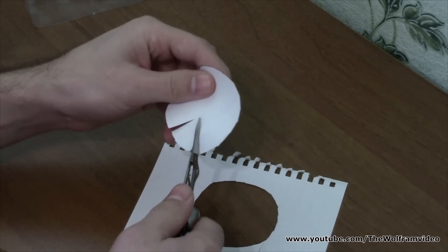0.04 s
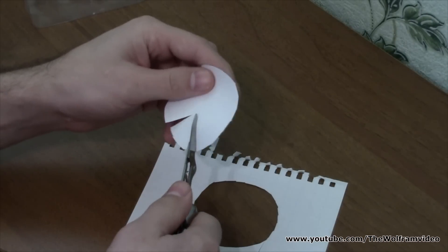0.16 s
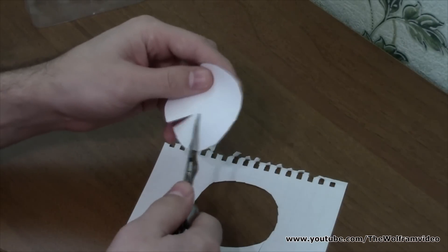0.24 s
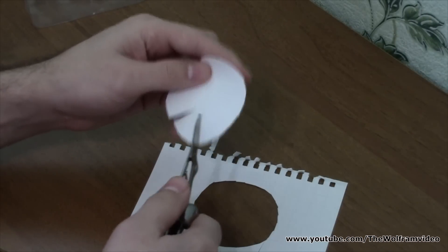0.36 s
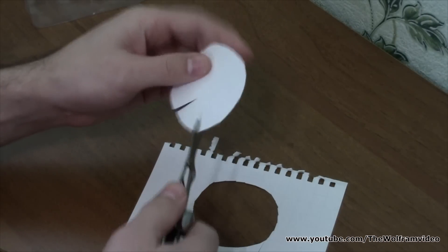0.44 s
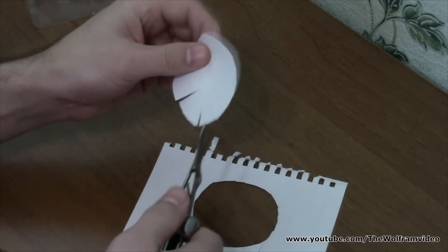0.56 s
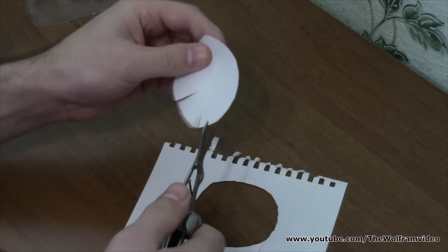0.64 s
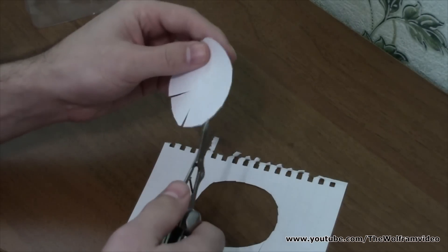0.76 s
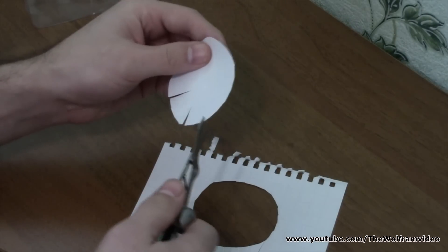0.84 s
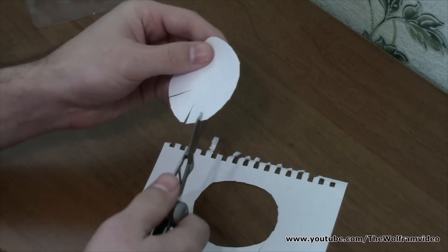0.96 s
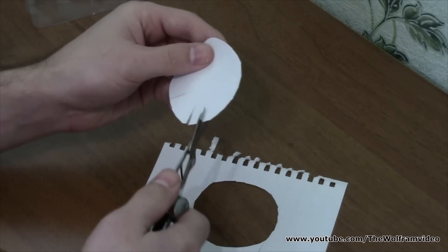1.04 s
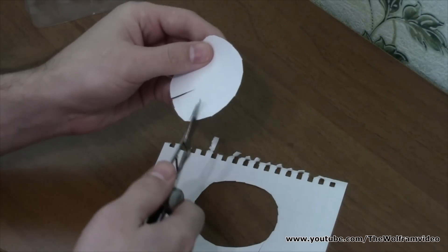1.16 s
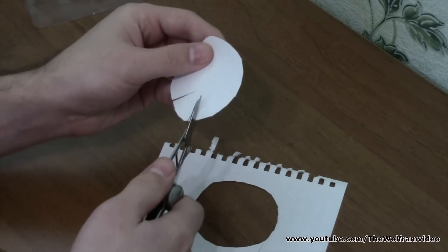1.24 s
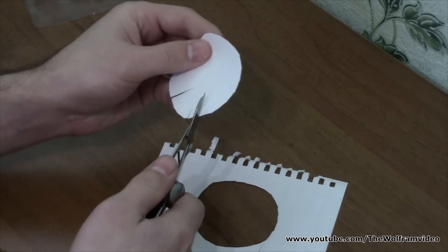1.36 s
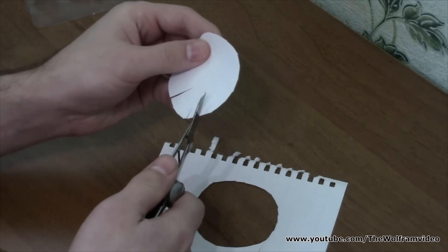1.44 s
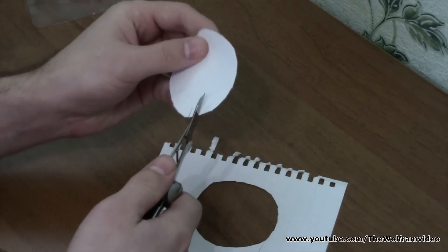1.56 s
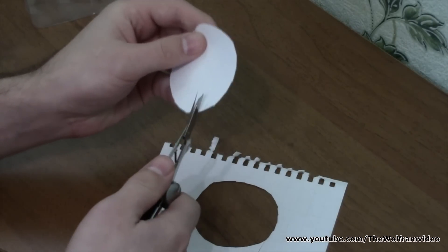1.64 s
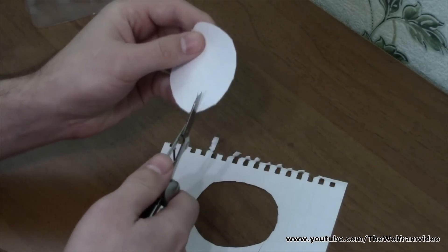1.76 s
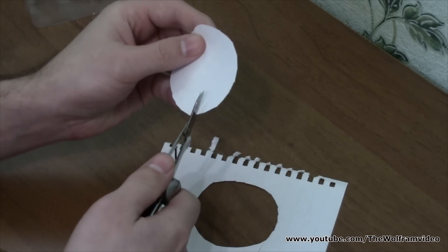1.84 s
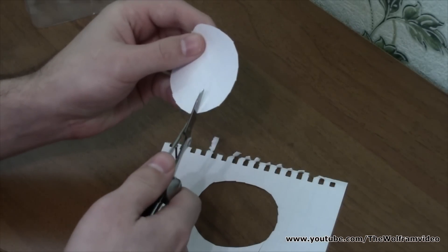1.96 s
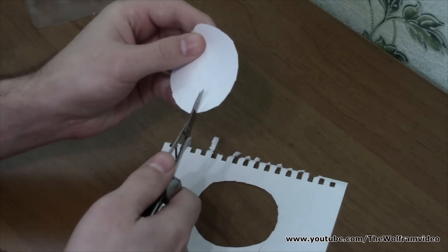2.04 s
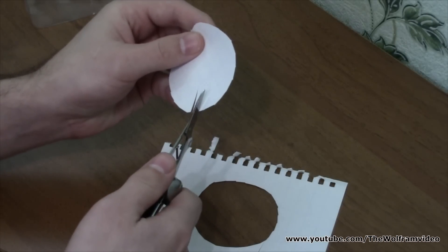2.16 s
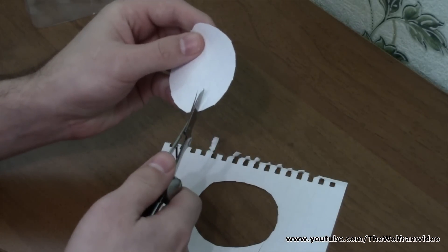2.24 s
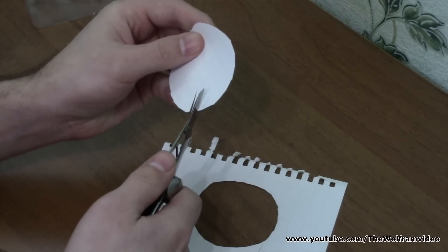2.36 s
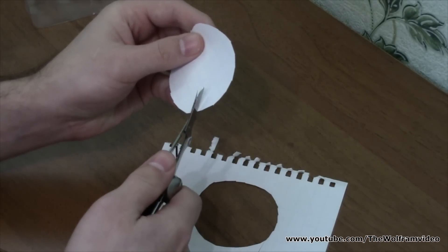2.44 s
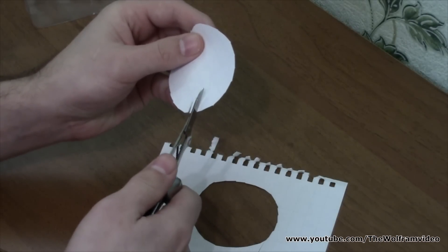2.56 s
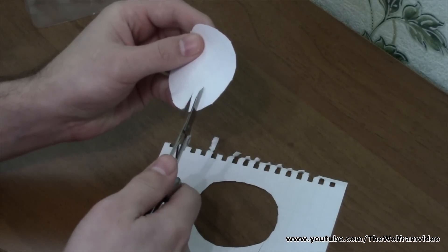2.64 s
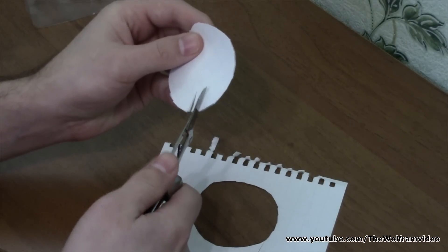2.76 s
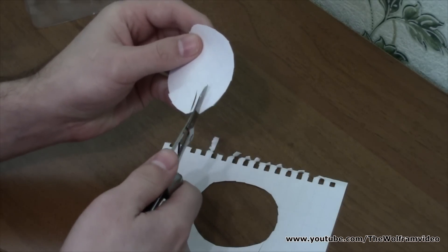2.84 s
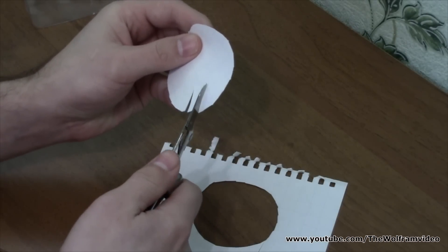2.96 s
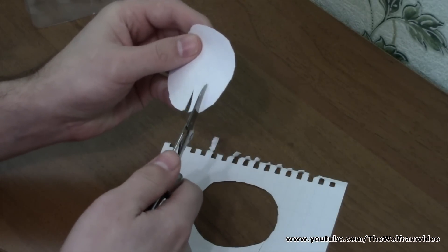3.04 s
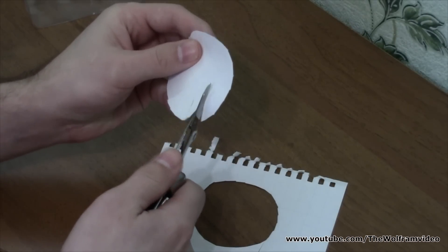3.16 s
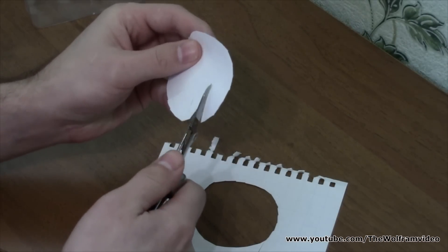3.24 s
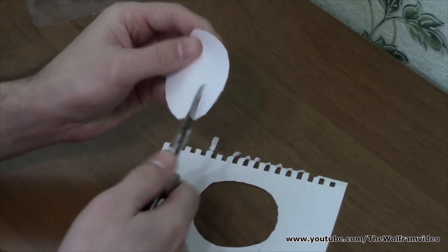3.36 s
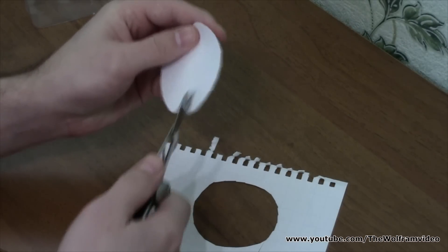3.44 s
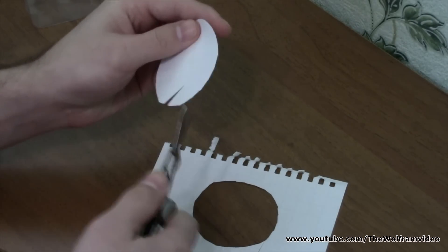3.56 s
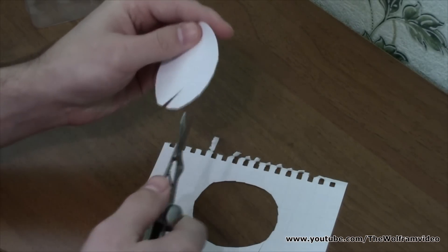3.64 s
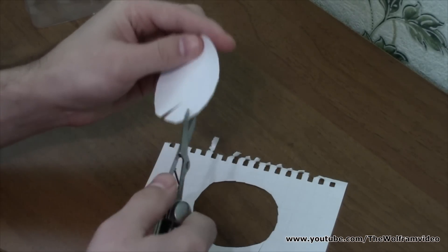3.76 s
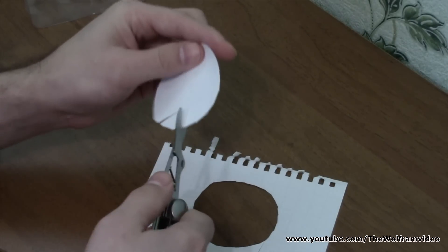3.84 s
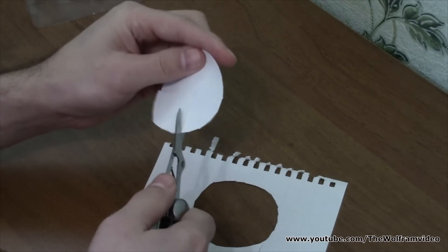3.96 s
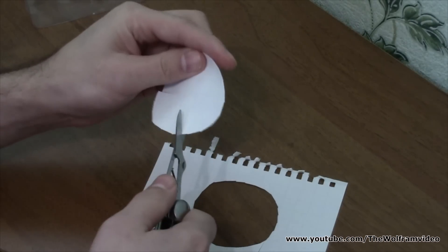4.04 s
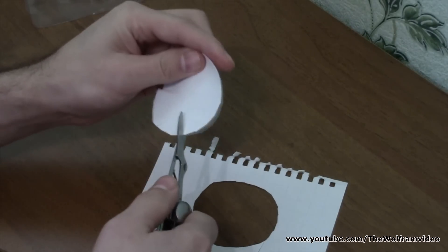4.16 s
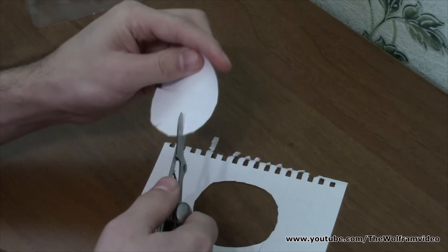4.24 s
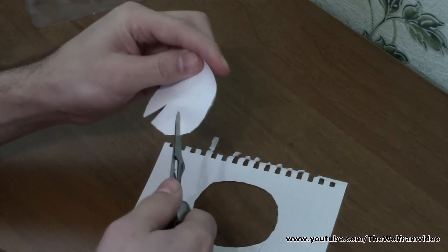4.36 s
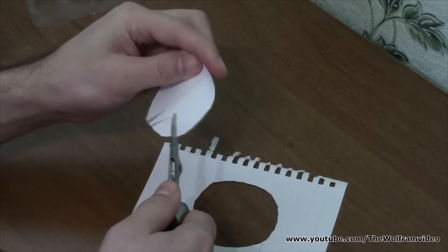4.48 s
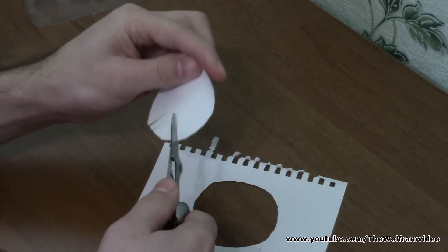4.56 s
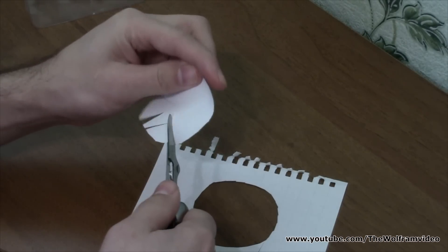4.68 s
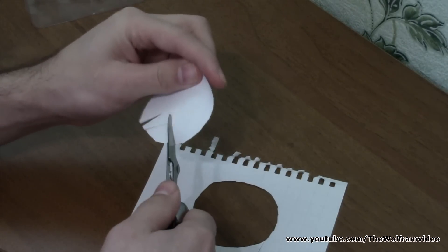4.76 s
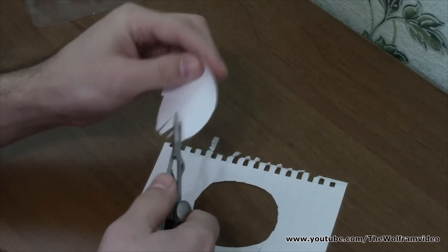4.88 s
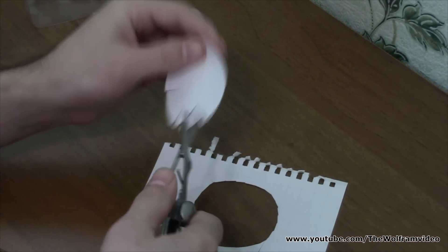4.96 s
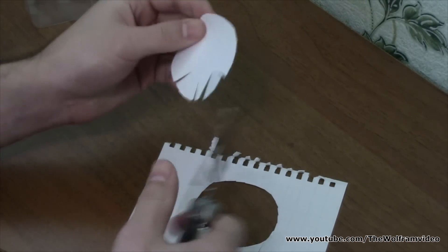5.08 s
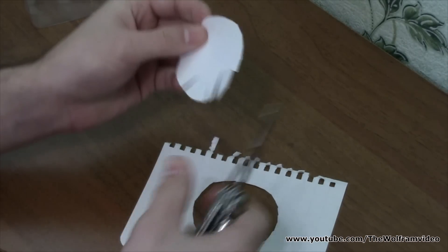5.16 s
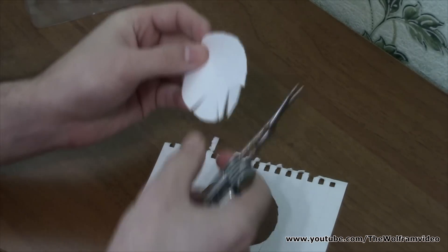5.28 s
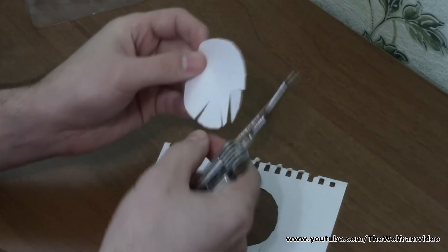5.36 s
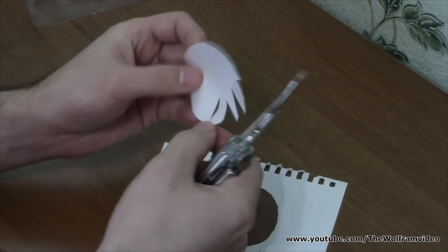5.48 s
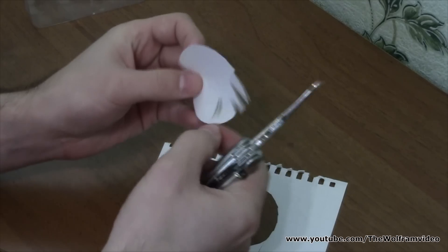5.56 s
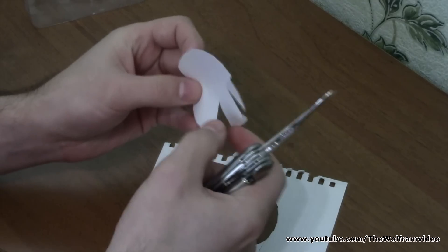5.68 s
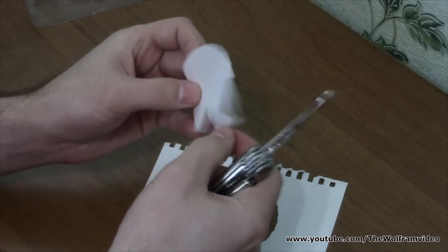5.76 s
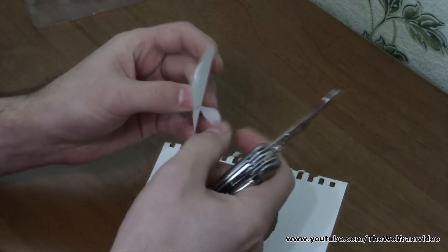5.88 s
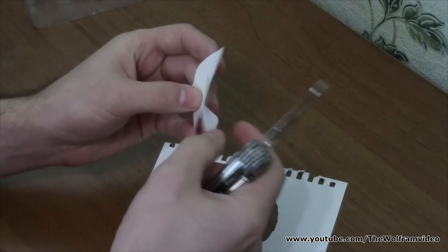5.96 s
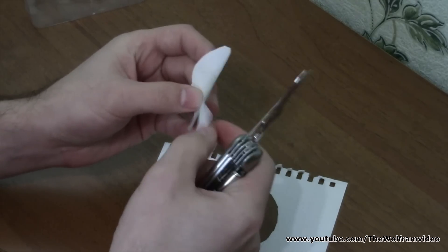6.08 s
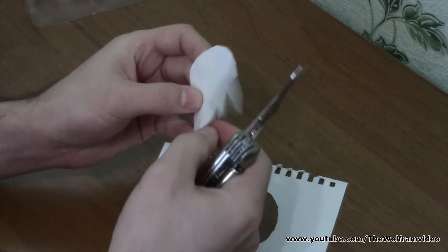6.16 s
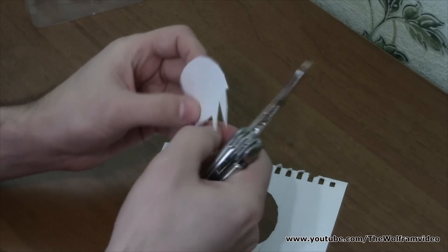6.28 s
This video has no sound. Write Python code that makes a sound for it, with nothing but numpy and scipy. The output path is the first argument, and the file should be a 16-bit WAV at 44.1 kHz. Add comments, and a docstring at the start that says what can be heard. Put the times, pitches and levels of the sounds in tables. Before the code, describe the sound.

Close, dry paper cutting with crisp irregular snips and crackles over faint room hiss, ending in a loud metallic clack and a tiny squeak.

```python
"""Air rushes and a fan hums faintly in a quiet room while small folding scissors cut slits into a
hand-held paper disc. From the start, strokes of tiny fibre breaks and blade slips, with snaps and random
crackles, ring the sheet, the cut and the blades. Soft bumps on the grip, then steel ticks, fall among them.
Late on, the handle clacks as the tool is turned in the hand, and the pivot squeaks faintly near the end.
Bursts of noise drive damped resonances for the blows; filtered noise and wavering sines make the room."""
import sys
import numpy as np
from scipy import signal
from scipy.fft import rfft, irfft
from scipy.io import wavfile

SR = 44100
rng = np.random.default_rng(int(sys.argv[2]) if len(sys.argv) > 2 else 0)


def generate_wav(signal):
    """Clip the signal to [-1, 1] and save it as 16-bit WAV at the path in sys.argv[1]."""
    frames = np.transpose(np.atleast_2d(signal))
    scaled = np.clip(frames, -1, 1) * 32767
    pcm = np.round(scaled).astype(np.int16)
    wavfile.write(sys.argv[1], SR, pcm)


N = 278712
TIME = np.arange(N) / SR
LEFT_RIGHT = np.array([[1], [-1]])   # sign of the side signal in each channel

# strokes of the blades along the paper: crest t/s, length/s, crunch level/dB,
# sheet flex over crunch/dB, glide (blade hiss over crunch)/dB
STROKES = [(0.008, 0.06, -34.5, -13, 2.5), (0.22, 0.27, -47.5, -7.5, 1.5), (0.517, 0.12, -39.5, -2.5, 8),
           (0.681, 0.045, -54, -16, 5.5), (0.743, 0.24, -59, -6, 0.5), (1.32, 0.12, -48.5, -4.5, 3),
           (1.465, .11, -50, -10, 2), (1.77, .33, -56.5, 0.5, 0.5), (1.92, 0.077, -43.5, -11, -0.5),
           (2.228, .085, -56.5, -13, 4), (2.649, 0.074, -49, -24, 0), (2.726, .085, -40, -19, -4),
           (2.933, .125, -47.5, -3, 0), (3.042, 0.11, -42, -8, -2), (3.251, 0.17, -46, -11, 2),
           (3.317, 0.095, -36, -10, -2.5), (3.498, 0.048, -43, -3.5, 0), (3.556, 0.14, -43.5, -5.5, 9),
           (4.006, 0.36, -54.5, -5, 2), (4.312, 0.062, -49, -1, -3.5), (4.478, 0.13, -36, -10.5, -4.5),
           (4.674, 0.072, -40, -5, -5.5), (4.788, 0.18, -44, -0.5, -3), (4.982, 0.14, -48.5, -4, -4.5),
           (5.043, 0.035, -36, -12, -3.5), (5.076, 0.069, -45, -3, 0), (5.284, 0.031, -41.5, -22, -3.5),
           (5.637, 0.28, -50, -12, -3), (5.94, .06, -49, -10, 6), (6.014, 0.064, -50.5, -3, -3)]
# bands in which sheet, cut and blades sound, one row each: low f/Hz, high f/Hz (capped at 0.45 SR)
RANGES = [(330, 2200), (2150, 7300), (5400, 45000)]


def from_db(db):
    """Decibels to gain."""
    return 10 ** (np.asarray(db) / 20)


def rms_one(x):
    """Scale to unit power."""
    return x / np.sqrt(np.mean(x ** 2) + 1e-20)


def at_hz(points, hz):
    """Read a table on a log-frequency axis."""
    table_hz, values = np.transpose(points)
    return np.interp(np.log(hz + 1e-9), np.log(table_hz), values)


def drift(rate_hz):
    """Smooth random motion of spread 1: noise rolled off above the rate."""
    hz = np.arange(N // 2 + 1) * SR / N
    return rms_one(irfft(rfft(rng.standard_normal(N)) / (1 + (hz / rate_hz) ** 2), N))


def band(x, low_hz, high_hz):
    """Causal band-pass."""
    edges = [low_hz, min(high_hz, .45 * SR)]
    return signal.sosfilt(signal.butter(2, edges, "band", fs=SR, output="sos"), x)


def low_pass(x, top_hz):
    """Soften the treble without delay."""
    return signal.sosfiltfilt(signal.butter(2, top_hz, fs=SR, output="sos"), x)


def mode_responses(modes, limits, size=2048):
    """One damped ring per resonance, wider ones dying sooner; together they have unit power gain."""
    t = TIME[:size]
    rings = []
    for k, (hz, width_hz, db) in enumerate(modes):
        decay = width_hz * np.exp(-np.pi * width_hz * t)
        rings.append((-1) ** k * from_db(db) * decay * np.cos(2 * np.pi * hz * t))
    rings = band(rings, *limits)
    return rings / np.linalg.norm(rings.sum(axis=0))


def body(force, modes, limits):
    """A force rings all the resonances of one part."""
    return signal.fftconvolve(force, mode_responses(modes, limits).sum(axis=0))[:N]


def touched_body(force, modes, limits, favoured_hz, reach, lift, scatter_db, slips_per_s=110):
    """Resonances near a moving pitch are favoured, while chance keeps sharing the force out anew."""
    rings = mode_responses(modes, limits)
    octave_like = np.log(np.array(modes)[:, :1] / favoured_hz)   # natural-log distance from the pitch
    shares = 1 + lift * np.exp(-(octave_like / reach) ** 2)
    chance = from_db(scatter_db * rng.standard_normal((len(modes), 1024)))
    shares = shares * [np.interp(TIME * slips_per_s, np.arange(len(row)), row) for row in chance]
    power = np.sum(rings ** 2, axis=1)
    shares = shares / np.sqrt(power @ shares ** 2 / power.sum())   # colour changes, loudness stays
    return signal.oaconvolve(force * shares, rings, axes=1).sum(axis=0)[:N]


def bursts(rows, size=2500):
    """Each blow is a dense, briefly fading cluster of contacts; one force per level column."""
    force = np.zeros((len(rows[0]) - 2, N + size))
    for s, length, *levels_db in rows:
        at = int(np.clip(s * SR, 0, N))
        contacts = rng.choice([-1, 1], (len(force), size)) * np.exp(-(TIME[:size] / length) ** 2)
        force[:, at:at + size] += from_db(levels_db)[:, None] * contacts
    return force[:, :N]


def room_noise(level_db):
    """Steady rush of air: shaped noise, more alike on both sides above the bass."""
    # colour of the air: f/Hz, relative level per Hz/dB
    air = [(20, -13.5), (50, -4.5), (85, -10), (130, -1), (175, -2.5), (210, -3), (300, -2), (370, -8.5),
           (800, -9.5), (1100, -14.5), (2200, -17.5), (4500, -24.5), (9800, -28), (16000, -37)]
    # likeness of the two sides: f/Hz, likeness/0-1
    likeness = [(40, 0), (130, 0.12), (300, 0.26), (600, 0.29), (1200, 0.69), (4000, 0.75), (14000, 0.68)]
    hz = np.arange(N // 2 + 1) * SR / N
    mid, side = rfft(rng.standard_normal((2, N)))
    alike = at_hz(likeness, hz)
    sides = np.sqrt(1 + alike) * mid + np.sqrt(1 - alike) * side * LEFT_RIGHT
    return from_db(level_db) * rms_one(irfft(sides * from_db(at_hz(air, hz)), N))


def fan(waver_db, wander_rad):
    """Hum lines: sines that waver in level and phase."""
    # steady lines of the fan: f/Hz, rms level before the waver/dB
    lines = [(119, -65), (151, -58.5), (178, -63), (254, -61), (312, -70.5), (425, -68.5), (602, -65.5),
             (834.5, -61), (2030, -71.5), (2315, -72.5)]
    hum = np.zeros(N)
    for hz, db in lines:
        level = np.sqrt(2) * from_db(db + waver_db * drift(2.4))
        hum += level * np.sin(2 * np.pi * hz * TIME + wander_rad * drift(1.75))
    return hum


def stroke_contour():
    """Strength and glide in dB, passing in straight lines from each stroke to the next."""
    crest, _, level_db, _, glide_db = np.transpose(sorted(STROKES))
    return np.interp(TIME, crest, level_db), np.interp(TIME, crest, glide_db)


def pressure():
    """Force on sheet, cut and edge: swells and fades as the blades close."""
    rise = 0.44   # part of a stroke spent building up pressure
    power = np.zeros((3, N))
    for crest, length, level_db, flex_db, glide_db in STROKES:
        swell = np.interp(TIME, crest + length * np.array([-rise, 0, 1 - rise]), [0, 1, 0])
        on = swell > 0
        gains = from_db(level_db + np.array([flex_db, 0, glide_db]))
        power[:, on] += np.outer(gains, swell[on]) ** 2
    return np.sqrt(power)


def fibres(per_s, spread_db):
    """Fibres break at random moments; a positive spread makes a few large, a negative one a few small."""
    sizes = from_db(spread_db * np.minimum(rng.exponential(1, N), 4))
    return rms_one(sizes * rng.choice([-1, 1], N) * (rng.random(N) < per_s / SR))


def stick_slip(per_s, jitter, release_s, glide, count=2000):
    """The blade catches and lets go at uneven intervals, over a steady glide."""
    at = (np.cumsum(np.exp(jitter * rng.standard_normal(count))) / per_s * SR).astype(int)
    slips = np.bincount(np.minimum(at, N), rng.uniform(0.088, 1, count), N + 1)[:N]
    return rms_one(glide + signal.lfilter([1], [1, -np.exp(-1 / (release_s * SR))], slips))


def strokes(force):
    """Under pressure the blades catch and slip, and fibres break."""
    catching = stick_slip(per_s=125, jitter=.45, release_s=0.0033, glide=0.66)
    flex = catching * fibres(per_s=3000, spread_db=6.0)
    crunch = catching * fibres(per_s=6500, spread_db=1.5)
    edge = catching ** 1.4 * fibres(per_s=12000, spread_db=-2.5)   # denser, more even grains on steel
    return force * [flex, crunch, edge]


def snaps(bite, glide_db, count=600):
    """Loud paper snaps and random small crackles; crackles grow with the bite of the blades."""
    # the loudest snaps of the paper: t/s, length/s, crunch level/dB, sheet flex over crunch/dB
    loud_snaps = [(0.002, 0.0055, -25, -18), (0.2225, 0.0043, -36.5, -15), (0.259, 0.0018, -32, -2),
                  (0.2665, 0.0024, -36, -4), (0.272, 0.0021, -34.5, 2), (0.281, 0.01, -41, -0.5),
                  (0.3675, 0.0055, -43, 2), (0.4163, 0.0041, -26, 1.5), (0.4305, 0.014, -34.5, 2),
                  (2.70, 0.01, -40.5, -20), (2.73, 0.0034, -30.5, -12), (2.9035, 0.0022, -34, -2),
                  (2.9154, 0.0023, -32.5, -7), (3.0225, 0.0029, -33, -16), (3.036, 0.0026, -35, -4),
                  (3.053, 0.0017, -31.5, -10), (3.084, 0.0022, -32.5, -8), (3.206, 0.014, -40.5, -1),
                  (3.2945, 0.0055, -30, -17), (3.315, 0.0013, -36, -6), (3.369, 0.0032, -32, 4),
                  (3.394, .0027, -36.5, -6), (3.483, .0036, -46, -8), (3.555, 0.0025, -31, -22),
                  (4.0455, 0.0022, -34.5, -5), (4.216, 0.0029, -35.5, -6.5), (4.402, 0.0058, -34, -3),
                  (4.466, 0.0099, -28.5, -17), (4.558, 0.002, -32, -14), (4.6655, 0.0048, -27, -6),
                  (4.719, 0.0053, -37.5, -3), (4.79, 0.013, -31.5, 0.5), (4.809, 0.0035, -26, 1),
                  (4.823, .0024, -22, -2), (4.8295, .003, -37, 5), (4.929, 0.0022, -39, -6)]
    crackles_per_s, crackle_s, crackle_flex_db = 65, 0.0018, -6
    crackle_db, crackle_spread_db = 3, 2   # over the bite
    glide_smooths = 1   # dB of crackle lost per dB of positive glide
    snap_edge_db = -2   # a snap rings the blades less than the stroke around it
    s = np.cumsum(rng.exponential(1 / crackles_per_s, count))
    bite_db = 20 * np.log10(bite + 1e-9) - glide_smooths * np.maximum(glide_db, 0)
    levels_db = np.interp(s, TIME, bite_db) + crackle_db + crackle_spread_db * rng.standard_normal(count)
    crackles = [(at, crackle_s, db, crackle_flex_db) for at, db in zip(s, levels_db) if at < TIME[-1]]
    rows = []
    for at, length, db, flex_db in list(loud_snaps) + crackles:
        edge_db = db + snap_edge_db + glide_db[int(at * SR)]
        rows.append((at, length, db + flex_db, db, edge_db))
    return bursts(rows)


def sheet(force, level_db, glide_db):
    """The flexing sheet favours higher resonances in harder strokes and lower ones in gliding strokes."""
    # resonances of the flexing sheet: f/Hz, width/Hz, relative level/dB
    flex_modes = [(460, 160, -6.5), (754, 53, 2), (1073, 190, -2.5), (1300, 120, 3.5), (1523, 144, 2)]
    octaves = 2 * (level_db + 45) - 2.2 * glide_db   # a harder stroke stiffens the sheet
    return touched_body(force, flex_modes, RANGES[0], 790 * 2 ** octaves, reach=0.23, lift=.9, scatter_db=2.5)


def cut(force, glide_db):
    """A gliding stroke crunches higher, and the place of the cut moves along the blade."""
    # resonances that colour the crunch: f/Hz, width/Hz, relative level/dB
    crunch_modes = [(2420, 480, -8.5), (2834, 130, -4), (3130, 270, 1), (3520, 360, -5), (3650, 230, -4),
                    (4050, 290, -1), (4198, 206, -1), (4970, 510, -11.5)]
    octaves = 0.5 * glide_db + 0.14 * drift(3)
    return touched_body(force, crunch_modes, RANGES[1], 4070 * 2 ** octaves,
                        reach=0.08, lift=0.77, scatter_db=5)


def blades(force, glide_db):
    """The more freely the blades glide, the higher the rings they favour and the softer their top."""
    # resonances of the thin blades: f/Hz, width/Hz, relative level/dB
    edge_modes = [(5680, 850, -2.5), (6500, 610, 2), (7130, 770, 0.5), (8350, 780, 0.5), (9030, 740, 1.5),
                  (10050, 750, 0.5), (11440, 1040, -5), (14800, 2500, -14.5)]
    full_glide_db, glide_top_hz = 8, 10900   # a freely gliding blade loses the finest, highest grit
    edge_hz = 9630 * 2 ** (0.7 * glide_db)
    gritty = touched_body(force, edge_modes, RANGES[2], edge_hz, reach=0.071, lift=0.52, scatter_db=2.0)
    soft = low_pass(gritty, glide_top_hz)
    return gritty + np.clip(glide_db / full_glide_db, 0, 1) ** 2 * (soft - gritty)


def cutting():
    """Strokes and snaps flex the sheet, crunch at the cut and ring the blades."""
    force = pressure()
    level_db, glide_db = stroke_contour()
    flex, crunch, edge = strokes(force) + snaps(force[1], glide_db)
    return sheet(flex, level_db, glide_db) + cut(crunch, glide_db) + blades(edge, glide_db)


def bumps():
    """Soft bumps of the hand ring the low, damped resonances of the grip."""
    # bumps of the hand: t/s, length/s, level/dB
    touches = [(0.4165, 0.025, -41), (2.204, 0.0076, -44), (4.046, 0.034, -48), (4.29, 0.025, -43),
               (5.1905, 0.029, -40), (6.296, 0.013, -35)]
    # resonances of the grip: f/Hz, width/Hz, relative level/dB
    grip_modes = [(245, 67, 0.5), (510, 106, 0.5), (790, 220, 2), (1120, 260, 0), (1480, 210, 1),
                  (2260, 990, -10.5), (3000, 240, -1), (4300, 1600, -10)]
    return body(bursts(touches)[0], grip_modes, (180, 5000))


def ticks():
    """The steel blades tick against each other and ring brightly."""
    # contacts of the blades: t/s, length/s, level/dB
    contacts = [(1.239, 0.0025, -42.5), (1.2735, 0.0011, -32.5), (1.442, 0.0053, -31),
                (2.203, 0.0065, -37.5), (4.2868, 0.0068, -28), (5.557, 0.0045, -38.5),
                (6.0045, 0.0027, -38.5)]
    # resonances of the struck steel: f/Hz, width/Hz, relative level/dB
    steel = [(3130, 280, -5), (4000, 250, -8), (4960, 320, -5), (6000, 240, -12), (6800, 250, -7),
             (7250, 130, -2), (7750, 790, -3), (9430, 480, 1.5), (10900, 420, -4), (12100, 500, -10),
             (13700, 310, -11), (15300, 450, -15)]
    return body(bursts(contacts)[0], steel, (2200, 16000))


def clacks():
    """The handle parts scrape, clack and rebound, ringing the handle."""
    # blows between the handle parts: t/s, length/s, level/dB
    blows = [(5.7275, 0.0089, -38), (5.7328, 0.0077, -17), (5.7486, 0.0017, -11), (5.756, 0.0024, -21),
             (5.844, 0.0039, -30.5), (6.291, 0.0071, -33.5), (6.296, 0.0037, -25.5)]
    # resonances of the handle: f/Hz, width/Hz, relative level/dB
    handle = [(457, 210, -4), (960, 180, -9), (1235, 140, 0), (1920, 970, -5.5), (2650, 360, 0),
              (3170, 300, 5), (3570, 280, 1), (3900, 310, -3.5), (4630, 390, -1.5), (5840, 420, -2),
              (6700, 580, -5.5), (7200, 390, -4), (9230, 850, -5.5), (10900, 930, -10), (14500, 3300, -22)]
    return body(bursts(blows)[0], handle, (260, 17000))


def squeak():
    """The pivot squeaks faintly: rubbing noise rings a single resonance."""
    # swell of the rubbing: t/s, level/dB
    swell = [(6.11, -71), (6.14, -59), (6.22, -55.5), (6.27, -56), (6.3, -75)]
    level_db = np.interp(TIME, *np.transpose(swell), left=-120, right=-120)
    rubbing = from_db(level_db) * rng.standard_normal(N)
    return body(rubbing, [(3720, 280, 0)], (3000, 4800))   # f/Hz, width/Hz, level/dB


def room(x, wet_db, side_db, first_echo_s, size=16000):
    """A short diffuse tail, nearly alike on both sides; its treble dies first."""
    t60_s, treble_t60_s = 0.24, 0.15
    t = TIME[:size]
    noise = rng.standard_normal((2, size))
    dull = low_pass(noise, 6500)
    tails = dull * from_db(-60 * t / t60_s) + (noise - dull) * from_db(-60 * t / treble_t60_s)
    tails = tails * np.clip(t / first_echo_s - 1, 0, 1)   # silent up to the first echo
    mid, side = (signal.fftconvolve(x, tail / np.linalg.norm(tail))[:N] for tail in tails)
    return x + from_db(wet_db) * (mid + from_db(side_db) * side * LEFT_RIGHT)


def scene():
    """Scissors and paper in the room, over air and fan; everything leans just right of centre."""
    close = cutting() + bumps() + ticks() + clacks() + squeak()
    heard = room(close, wet_db=-6.5, side_db=-13, first_echo_s=0.00091)
    background = room_noise(level_db=-46.5) + fan(waver_db=2.0, wander_rad=1.0)
    return (heard + background) * from_db([[-.25], [.25]])


def record(dry):
    """The top is cut steeply above 15.9 kHz."""
    return signal.sosfilt(signal.ellip(12, .2, 80, 15900, fs=SR, output="sos"), dry)


dry = scene()
out = record(dry)
generate_wav(out)
```